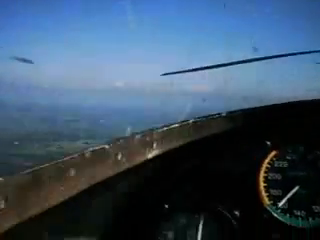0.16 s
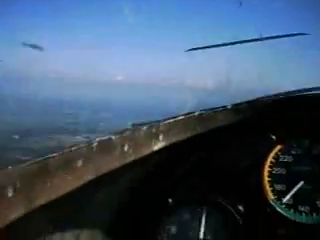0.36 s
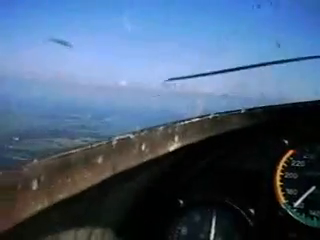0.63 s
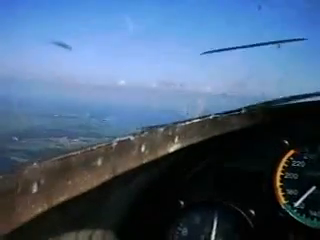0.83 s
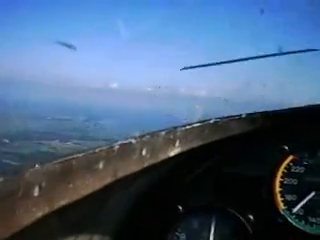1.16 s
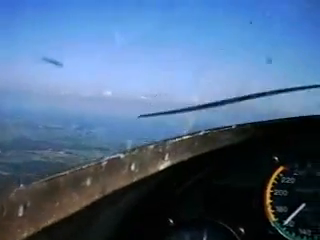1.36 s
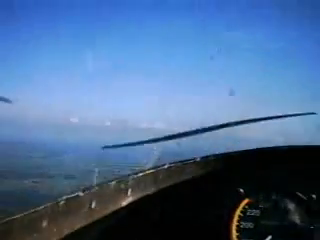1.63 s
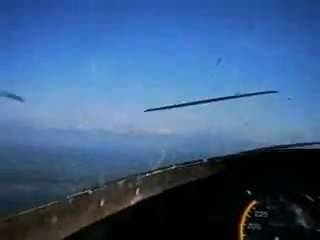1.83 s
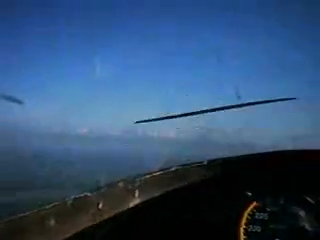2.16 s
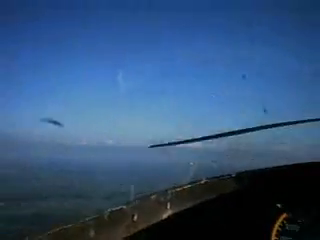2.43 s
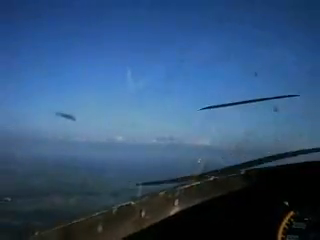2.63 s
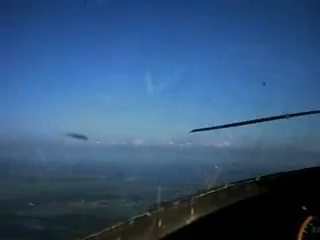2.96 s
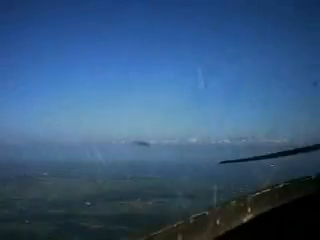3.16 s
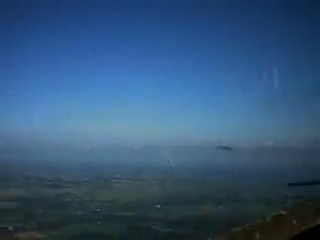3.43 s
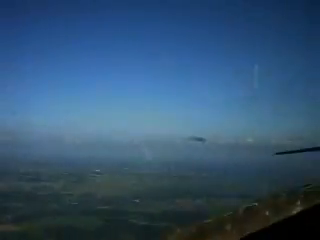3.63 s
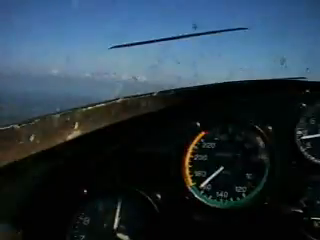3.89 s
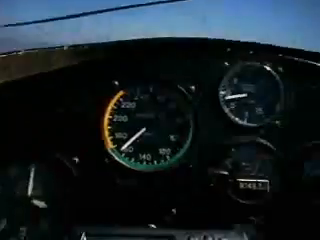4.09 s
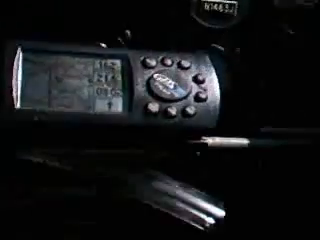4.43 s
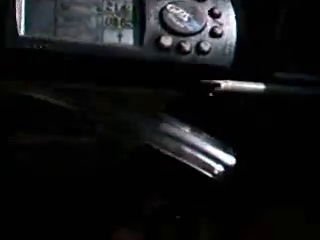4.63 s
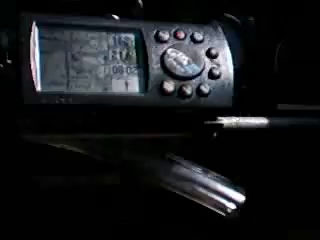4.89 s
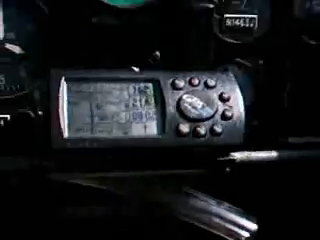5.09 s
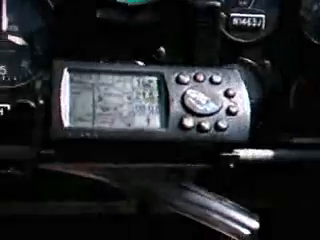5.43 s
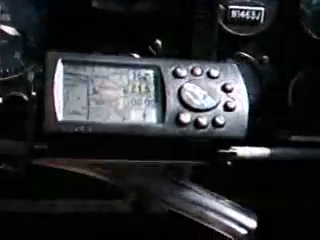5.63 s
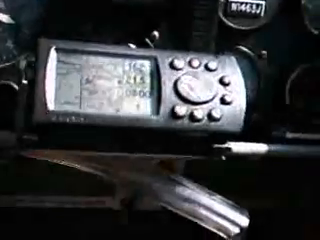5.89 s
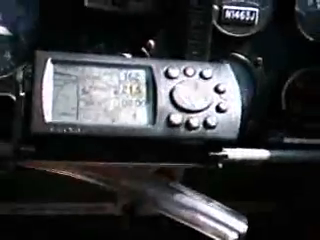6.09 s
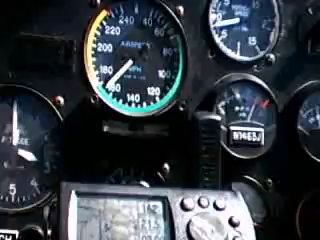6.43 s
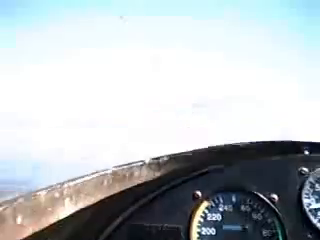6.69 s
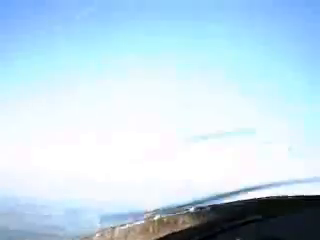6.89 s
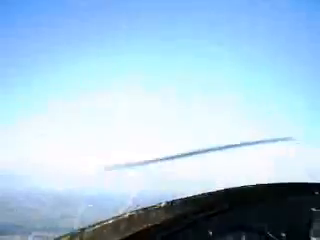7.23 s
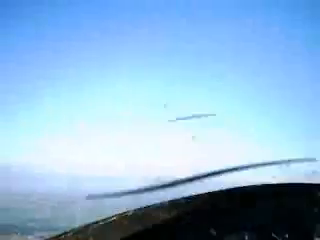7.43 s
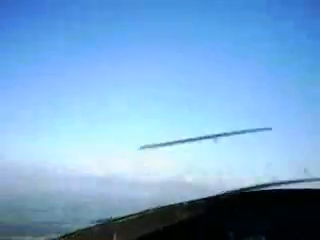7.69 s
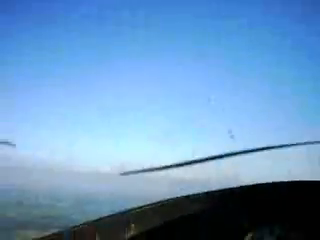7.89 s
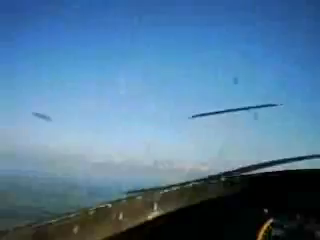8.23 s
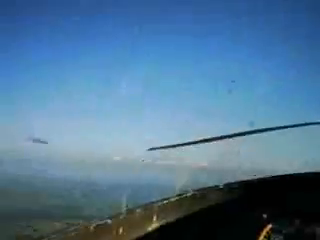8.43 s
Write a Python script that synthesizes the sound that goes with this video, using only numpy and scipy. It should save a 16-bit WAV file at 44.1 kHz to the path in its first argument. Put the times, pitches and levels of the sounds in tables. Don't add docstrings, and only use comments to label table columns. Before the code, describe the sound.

Continuous rushing wind over a canopy blends with engine noise into a dense broadband wash, close and distorted. There are no distinct engine pulses. A breathy resonant band around two and a half kilohertz wavers as the handheld camera sways; upper hiss dips and surges briefly. Soft bassy gust bumps lie underneath. Coarse compression makes everything grainy, metallic and bubbling, without any pause.

```python
import sys
import numpy as np
from scipy import signal
from scipy.fft import rfft, irfft, dct
from scipy.io import wavfile

SR = 44100
rng = np.random.default_rng(int(sys.argv[2]) if len(sys.argv) > 2 else 0)


def ratio_of_db(decibels):
    return 10 ** (np.asarray(decibels, float) / 20)


def inscribe(sig):
    pcm = np.round(np.clip(np.atleast_2d(sig).T, -1, 1) * 32767)
    wavfile.write(sys.argv[1], SR, pcm.astype(np.int16))


N = 377055

# frequency in Hz, density in dB per Hz.
ROAR_SPECTRUM = [(30, -12.5), (70, -11.5), (95, -5.5), (125, -1.5), (300, -1.5), (1000, 0.5), (1700, -2),
                 (2200, 0), (3150, 0.5), (3380, -3.5), (3650, 1.5), (3900, 1), (4100, -1.5)]
# time in seconds, level in dB, port tone in Hz, leak hiss in dB.
CAMERA_TURNS = [(0.0, -12.5, 2500, -9.5), (0.04, -18, 2550, -7), (0.07, -15.5, 2613, -11.5),
                (2.31, -15.5, 2650, -11.5), (2.76, -15.5, 2692, -8.5), (3.19, -16, 2477, -9),
                (3.4, -15, 2686, -10.5), (3.86, -15, 2552, -12.5), (3.93, -15, 2620, -18.5),
                (3.97, -16.5, 2614, -11), (4.05, -16, 2670, -20.5), (4.17, -16.5, 2590, -8),
                (4.4, -15, 2725, -12), (4.57, -18, 2610, -12), (4.62, -16, 2680, -10),
                (5.52, -15.5, 2662, -12), (7.98, -15.5, 2649, -10.5), (8.55, -15.5, 2658, -12)]
# time in seconds, tone
# shift in %, port swell in dB, leak swell in dB.
TONE_SWAYS = [(.15, 0.2, -1.7, -0.5), (.3, 1.4, -0.6, -4), (.65, 1.2, -0.5, -4.5), (.9, -2.4, -0.3, 1.6),
              (1.149, -1.1, -1.2, 1.8), (1.45, -0.5, 0.9, 3), (1.75, -.7, 0.6, -1), (2.1, 1.5, -2.1, 0.5),
              (2.35, 1, 0.4, -1.5), (2.6, -3, -2, 0.5), (2.95, -0.3, 0, 1.5), (3.15, -4.5, 1.5, 1),
              (3.5, 1.6, 0, -0.9), (3.7, -1.1, -1.5, 0), (3.9, 1.4, -0.4, -2.5), (4.2, 3, -0.5, 1.9),
              (4.4, 1, 1.4, 2.3), (4.7, -2.5, -0.5, 1.8), (4.95, 1.5, 0.8, 1.4), (5.15, 0.2, .3, 0.7),
              (5.3, -0.2, .5, -1.5), (5.45, 1.5, -1.2, -2.6), (5.65, 5.5, -0.4, -4.5), (5.9, 1, 1, -1.7),
              (6.2, -1.4, -0.6, 1.7), (6.5, 0.3, 0.1, 0.7), (6.7, -2.3, 0.2, -1.5), (6.85, 0.1, 1.1, 2),
              (7.05, -0.3, 1.35, 0.2), (7.25, 2, -0.5, -2.3), (7.45, -2, 0.1, 1.2), (7.6, .4, 1.1, 0),
              (7.8, -1.4, 0.46, 1.4), (8.05, -0.9, 1, 1.3), (8.3, 3.5, 0.9, -0.3), (8.5, -6, -1, 2.5)]
# time in seconds, change in dB.
LEAK_PUFFS = [(0.091, -3.5), (.2, -3.5), (.31, -10.5), (.45, -1.5), (.57, 5), (.61, -4.5), (.68, -4.5),
              (.86, 3.5), (1.33, -2.5), (1.379, 3.5), (2.9, 1.5), (3.332, 4.5), (3.49, 5.5), (3.67, -2.5),
              (3.741, -5), (3.79, -3), (3.84, -4.5), (3.979, -3.5), (5.67, -7.5), (6.828, 3.5),
              (7.05, -4.5), (7.32, 5), (7.75, 2.5), (7.86, 3.5), (8.378, -3.5), (8.45, 4.5)]
# time in seconds, pitch in Hz, level in dB.
GUST_THUMPS = [(1.139, 55.4, -34.5), (1.364, 69.5, -34.5), (3.027, 53.9, -35.5), (3.765, 69, -28.5),
               (3.987, 71.7, -31.5), (4.212, 62.5, -32), (4.85, 71.2, -33.5), (6.003, 69.8, -36.5),
               (6.515, 54.8, -28.5), (7.413, 69.8, -30.5), (0.249, 89.7, -32), (.96, 85.7, -34),
               (1.68, 85.4, -32), (2.199, 86.3, -36.5), (4.4, 99, -35), (3.55, 85.6, -33),
               (5.55, 85.4, -31), (5.9, 86.5, -33), (6.67, 86.7, -33.5), (7.62, 85.9, -34.5)]
# frequency in Hz, step change in dB.
STEP_BEND = [(100, -.7), (800, -1.2), (1700, 1.2), (2100, .3), (2600, -1.4), (3500, .9), (4400, 1.8),
             (4900, -2.3), (5250, -2.1), (5550, 2), (6100, -2.7), (6900, -2.5), (7300, .5)]
SPENT_S = [1.139, 1.299, 1.811, 2.035, 2.067, 2.355, 2.547, 3.027, 3.123, 3.347, 3.443, 4.211, 4.467, 4.595,
           4.627, 5.139, 5.459, 5.491, 6.003, 6.643, 6.771, 6.515]
RICH_S = [0.339, 0.563, 0.723, 0.755, 0.947, 1.075, 1.171, 1.203, 1.395, 1.491, 1.523, 1.619, 1.939, 2.131,
          2.291, 2.323, 2.643, 2.675, 3.379, 3.827, 3.987, 4.115, 4.499, 4.659, 4.851, 5.171, 5.203, 5.299,
          5.331, 5.523, 5.587, 5.715, 5.747, 6.099, 6.323, 6.387, 6.803, 6.835, 6.899, 7.443, 7.507, 7.571,
          7.827, 8.147, 8.307]
LEAN_S = [0.051, 0.083, 0.115, 0.147, 0.211, 0.275, 0.307, 0.627, 0.659, 7.795, 7.283, 0.595, 0.691, 0.915,
          1.235, 1.683, 2.163, 2.611, 2.771, 3.251, 3.283, 3.411, 3.699, 3.731, 3.859, 3.891, 4.083, 4.147,
          4.179, 4.371, 4.563, 4.947, 5.555, 5.939, 6.675, 6.739, 6.995, 7.347, 7.379, 7.731, 7.763, 7.859,
          8.115, 8.211, 8.499]
DRY_S = [1.715, 1.875, 2.099, 2.995, 3.699, 3.667, 3.923, 4.019, 6.579, 7.027, 7.475, 7.891, 8.275, 8.339,
         8.371, 8.403, 8.467]
EMPTY_S = [
    5.491,
]
# frequency in Hz, gain in dB.
PLAYBACK_FILTER = [(7000, 0), (7600, -2), (8000, -6.5), (8400, -14), (8800, -27.5), (9400, -58),
                   (10000, -83)]

CAMERA_RATE = 8008.77
FILE_RATE, FRAME = 16000, 512
FIRST = 309 - FRAME


def airflow():
    hz = np.fft.rfftfreq(N, 1 / SR)
    spectrum = rfft(rng.standard_normal(N)) * ratio_of_db(at_hz(ROAR_SPECTRUM, hz))
    roar = irfft(spectrum * (hz < CAMERA_RATE / 2), N)
    buffet_db = 0.26 * drift(rate=9.0)
    return roar * ratio_of_db(buffet_db)


def microphone_port(roar, port_hz, bend_percent, swell_db):
    waver = 0.014 * drift(rate=20.0)
    tone_hz = port_hz * (1 + bend_percent / 100 + waver)
    ringing = ratio_of_db(11) * resonance(roar, tone_hz, width=345)
    eddies_db = 1.0 * drift(rate=18.0)
    return ratio_of_db(swell_db + eddies_db) * ringing


def canopy_leaks(roar, leak_db, draught_db):
    turning_db = 0.7 * (leak_db - leak_db.mean())
    puffs_db = sum(db * bell(s, width_s=0.02) for s, db in LEAK_PUFFS)
    flutter_db = 1.0 * drift(rate=20.0)
    hiss = filtered(roar, signal.butter(2, 3300, "high", fs=SR, output="sos"))
    return roar + (ratio_of_db(turning_db + puffs_db + draught_db + flutter_db) - 1) * hiss


def thinnest_leak(roar):
    edge = filtered(roar, signal.butter(4, 3700, "high", fs=SR, output="sos"))
    flutter_db = 2 * drift(rate=16.0)
    return roar + (ratio_of_db(flutter_db) - 1) * edge


def thumps():
    t = np.arange(N) / SR
    out = np.zeros(N)
    for s, hz, db in GUST_THUMPS:
        out += ratio_of_db(db) * bell(s, width_s=0.024) * np.sin(2 * np.pi * hz * (t - s) + 0.68)
    return out


def at_hz(points, hz):
    point_hz, db = np.transpose(points)
    return np.interp(np.log(hz + 1), np.log(point_hz), db)


def in_time(rows):
    s, *columns = np.transpose(rows)
    return [np.interp(np.arange(N) / SR, s, column) for column in columns]


def bell(s, width_s):
    return np.exp(-0.5 * ((np.arange(N) / SR - s) / width_s) ** 2)


def rms_one(x):
    return x / np.sqrt(np.mean(x ** 2))


def drift(rate):
    r = np.exp(-2 * np.pi * rate / SR)
    noise = rng.standard_normal(N + SR)
    return rms_one(signal.lfilter([1], [1, -2 * r, r * r], noise)[SR:])


def filtered(x, sos):
    return signal.sosfilt(sos, x)


def resonance(x, hz, width):
    r = np.exp(-np.pi * width / SR)
    zeros = np.array([1, 0, -1]) * (1 - r * r) / 2
    out, state = np.zeros(N), np.zeros(2)
    for i in range(0, N, 512):
        poles = [1, -2 * r * np.cos(2 * np.pi * hz[i] / SR), r * r]
        out[i:i + 512], state = signal.lfilter(zeros, poles, x[i:i + 512], zi=state)
    return out


def scene():
    level_db, port_hz, leak_db = in_time(CAMERA_TURNS)
    sways = sum(np.outer(row[1:], bell(row[0], width_s=0.06)) for row in TONE_SWAYS)
    bend_percent, swell_db, draught_db = sways
    roar = canopy_leaks(airflow(), leak_db, draught_db)
    port = microphone_port(roar, port_hz, bend_percent, swell_db)
    wind = rms_one(thinnest_leak(roar) + port)
    return (ratio_of_db(level_db + 1.5) * wind + thumps())[None]


def camera_input(x):
    ceiling = 0.3
    clipped = ratio_of_db(1.5) * ceiling * np.tanh(x / ceiling)
    clipped = filtered(clipped, signal.butter(2, 60, "high", fs=SR, output="sos"))
    return filtered(clipped, signal.cheby1(4, 1, 3960, fs=SR, output="sos"))


def held_samples(x):
    count = np.floor(np.arange(N) * CAMERA_RATE / SR)
    return x[(count * SR / CAMERA_RATE).astype(int)]


def step_wander(count):
    wander_db = 0.3 + 0.6 * np.clip(rng.standard_normal(count), -2, 2)
    marked = ((SPENT_S, -3.7), (RICH_S, -1.8), (LEAN_S, 1.9), (DRY_S, 2.6), (EMPTY_S, 3.0))
    for times, step_db in marked:
        frame = np.round((np.array(times) * FILE_RATE - FIRST) / FRAME).astype(int)
        wander_db[frame] = step_db
    return wander_db[:, None]


def smooth_envelope(lines, order):
    lags = dct(lines ** 2 + 1e-12, axis=1)[:, :order + 1]
    square = lags[:, np.abs(np.subtract.outer(np.arange(order), np.arange(order)))]
    poles = np.linalg.solve(square, -lags[:, 1:, None])[:, :, 0]
    turn = np.exp(-1j * np.pi * np.outer(np.arange(1, order + 1), np.arange(FRAME) + 0.5) / FRAME)
    shape = 1 / np.abs(1 + poles @ turn) ** 2
    return shape / shape.mean(axis=1, keepdims=True)


def camera_compression(x):
    n = np.arange(2 * FRAME) + 0.5
    window = np.sin(np.pi * n / 2 / FRAME)[:, None] * np.sqrt(2 / FRAME)
    basis = np.cos(np.pi / FRAME * np.outer(n + FRAME / 2, n[:FRAME])) * window
    blocks = np.resize(np.roll(x, -FIRST), (len(x) // FRAME + 3, FRAME))
    lines = np.hstack([blocks[:-1], blocks[1:]]) @ basis

    loudness = np.sqrt(np.mean(lines ** 2))
    bend_db = at_hz(STEP_BEND, n[:FRAME] * FILE_RATE / 2 / FRAME)
    step = loudness * ratio_of_db(7.6 + step_wander(len(lines)) + bend_db)
    step = step * smooth_envelope(lines, order=10) ** (1 / 4)

    kept = np.sign(lines) * np.floor(np.abs(lines) / step + 0.5)
    kept = kept * (np.arange(FRAME) < 465)
    noise_table = 2 * rng.random((16, FRAME)) - 1
    filler = np.resize(noise_table, lines.shape)
    frames = (step * (kept + ratio_of_db(-28.0) * np.sqrt(3) * filler)) @ basis.T
    return (frames[1:, :FRAME] + frames[:-1, FRAME:]).ravel()


def playback(x):
    hz = np.fft.rfftfreq(N, 1 / SR)[:len(x)]
    early_s = 0.375 / FILE_RATE
    images = np.fft.fft(x) * ratio_of_db(at_hz(PLAYBACK_FILTER, hz)) * np.exp(2j * np.pi * hz * early_s)
    return irfft(images, N)[None] * N / len(x)


def low_pass(x):
    return signal.sosfilt(signal.butter(12, 9230, fs=SR, output="sos"), x)


def record(dry):
    size = N * FILE_RATE // SR
    held = held_samples(camera_input(dry[0]))
    low = irfft(rfft(held)[:size // 2 + 1], size) * size / N
    squeezed = camera_compression(np.roll(low, FRAME))[-FIRST:][:size]
    return low_pass(playback(squeezed))


dry = scene()
out = record(dry)
inscribe(out)
```